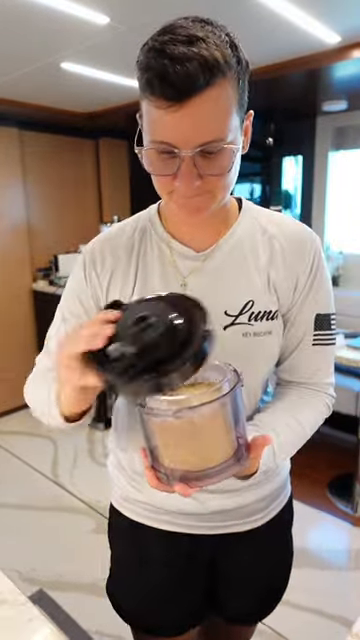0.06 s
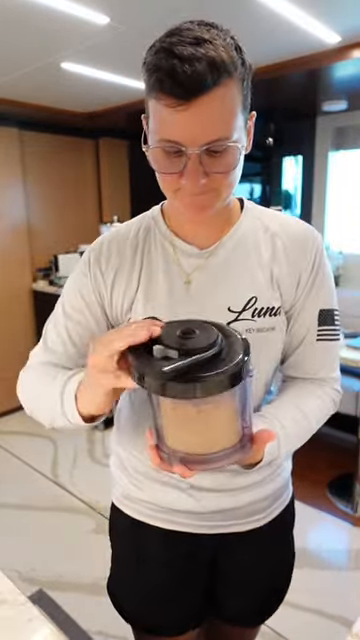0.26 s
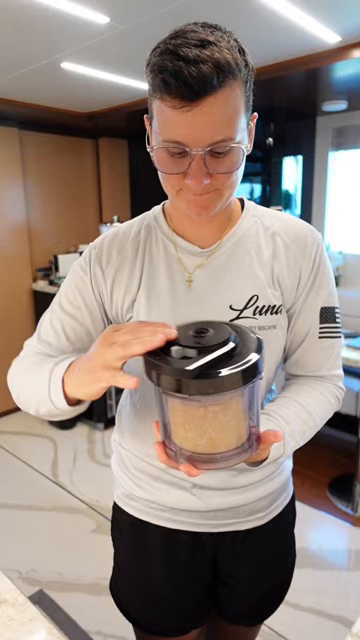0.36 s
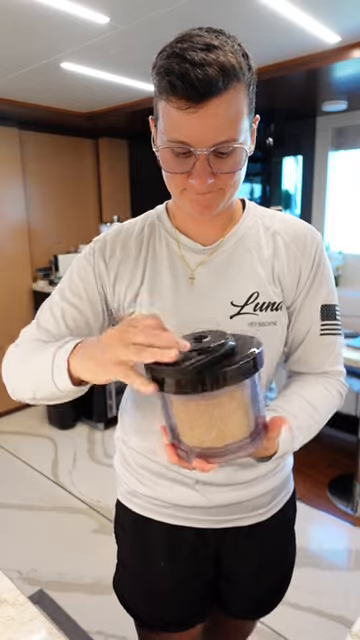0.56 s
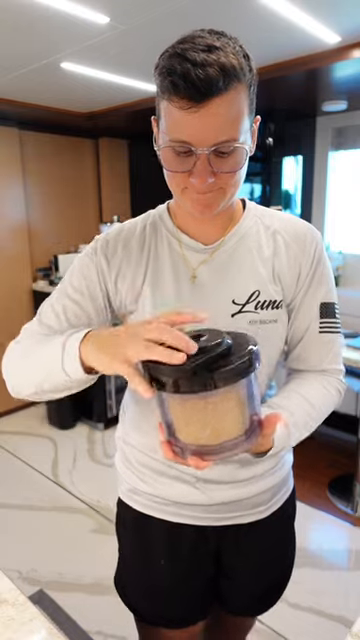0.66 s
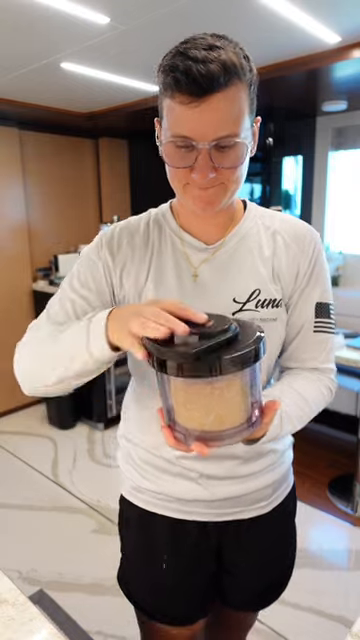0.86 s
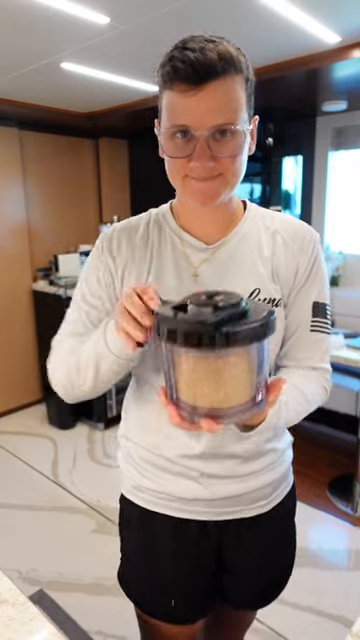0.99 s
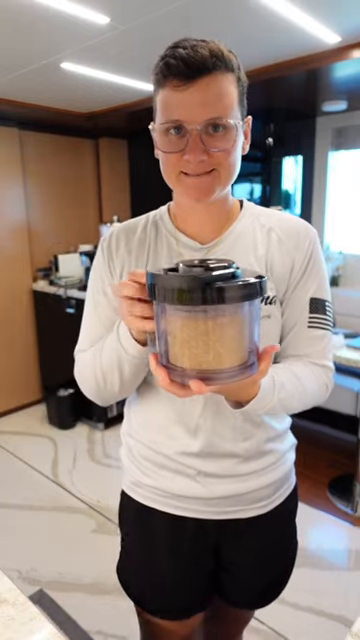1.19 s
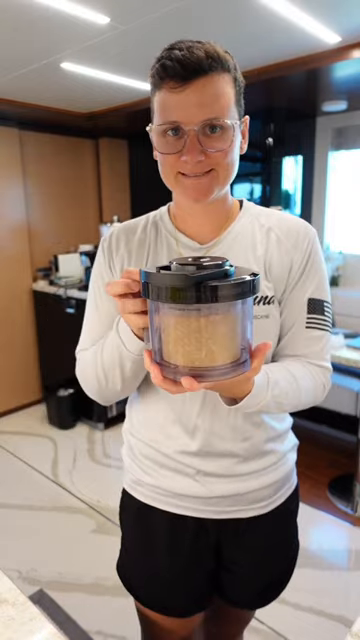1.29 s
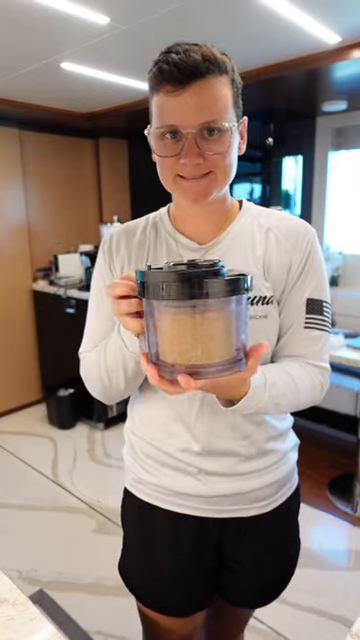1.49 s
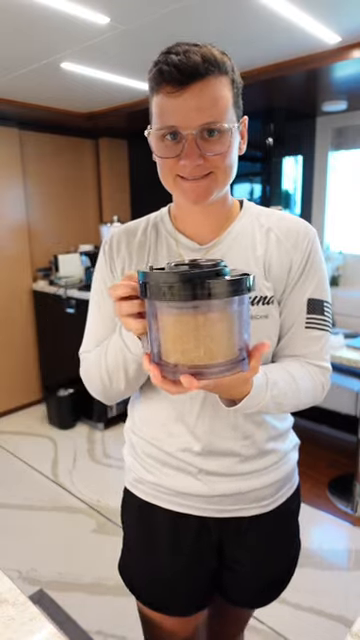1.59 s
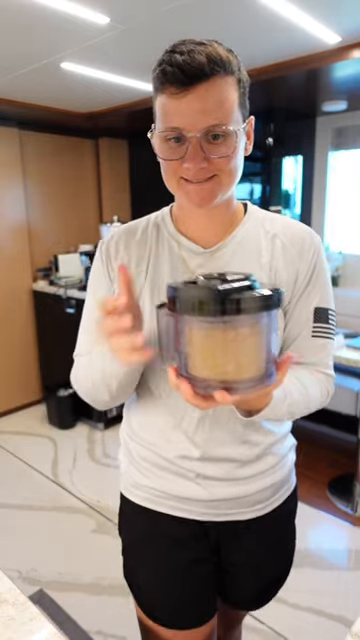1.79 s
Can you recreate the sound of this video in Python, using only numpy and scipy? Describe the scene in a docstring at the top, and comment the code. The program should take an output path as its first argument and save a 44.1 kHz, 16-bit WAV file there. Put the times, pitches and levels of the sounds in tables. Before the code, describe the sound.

A hard plastic lid is fitted onto a plastic bowl, close up. It rattles on the rim from about 0.2 seconds and clacks loudly into its seat near 0.45. Softer clacks and hollow thumps follow around 0.8 to 0.9. The latch snaps sharply shut at about 1.4 seconds, and fingers slide faintly off near 1.7. Ventilation hums throughout, and the small kitchen adds a short reverberation.

```python
"""A small galley, close up in stereo: a hard plastic lid is set on a filled plastic bowl and locked.
The loose lid rattles on the rim, clacks into its seat as it is pressed and twisted, and the latch snaps.
Each push draws a hollow thump from the bowl; at the end, fingers slide faintly off the lid.
Ventilation hums behind, and a limiter flattens the loudest snaps so that their room tails swell."""
import sys
import numpy as np
from scipy import signal
from scipy.fft import rfft, irfft
from scipy.io import wavfile
from scipy.ndimage import uniform_filter1d, minimum_filter1d

SR = 44100
rng = np.random.default_rng(int(sys.argv[2]) if len(sys.argv) > 2 else 0)


def transcribe(u):
    """Save the signal u as a 16-bit wav file named by the first command-line argument.

    u: samples, shape (n,) or (channels, n), limited to [-1, 1]; the rate is SR.
    q: integer samples, one column per channel.
    """
    v = np.clip(np.atleast_2d(u).T, -1, 1)
    q = np.round(v * 32767).astype(np.int16)
    wavfile.write(sys.argv[1], SR, q)


N = 81585

# air noise of the ventilation: frequency_hz, density_db
VENT_SPECTRUM = [(15, -75), (25, -51), (50, -24), (101, -3.5), (193, -13), (221, -4.5), (253, -8),
                 (368, -1.5), (421, -9.5), (509, -3), (582, -13.5), (1050, -23.5), (1240, -24.5),
                 (1380, -24), (2120, -32.5), (5140, -39.5), (15500, -53.5)]
# stereo width of the ventilation: frequency_hz, side_minus_mid_db
VENT_WIDTH = [(60, -25), (240, -22.5), (950, -8), (3770, -4), (15000, -9)]

# the lid clacks against the bowl, and at 0.85 s the latch snaps, sounding like a clack: start_s, level_db,
# tilt_db_per_octave, ring_db
CLACKS = [(0.169, -50, -2, -13), (0.4105, -28.5, -2, 1), (0.4298, -21.5, 2, -8), (0.4409, -6.5, .5, 1.5),
          (0.4505, -9, 0.5, -3), (0.685, -45.5, 2, -20), (0.817, -19, -4.5, 3), (0.85, -23.5, 3.5, -1),
          (0.9073, -22, -9.5, -6), (0.979, -45, 0, -4), (1.3897, -41, -1, -21), (1.419, -21, -3.5, -4)]
# spectrum of a clack: frequency_hz, density_db
CLACK_COLOUR = [(120, -40), (200, -38), (288, -10), (437, -1.5), (544, -10.5), (665, 1.5), (742, -7),
                (1190, -1.5), (1540, -8), (2170, -6.5), (4500, -11), (5390, -15), (10400, -19.5),
                (15500, -30.5)]
# modes of the bowl with the lid seated: pitch_hz, level_db, t60_s
SEATED_MODES = [(373, -5.5, 0.1), (466.6, -1.5, 0.15), (652, -42, 0.23), (983, -5, 0.27),
                (1050, -8.5, 0.18), (1162, -1, 0.17), (1173, -4, 0.22), (2145, -3, 0.2), (2259, -11, 0.31),
                (2436, -13, 0.24), (3310, -15.5, 0.19), (3374, -14.5, 0.16)]

# the loose lid knocks on the rim: start_s, level_db, tilt_db_per_octave, ring_db
KNOCKS = [(0.2348, -8.5, 1, 4.5), (0.2595, -15, 1.5, -4), (0.2862, -18, 2, -1), (0.3236, -15.5, -.5, -22),
          (0.343, -28.5, -5.5, -7), (0.361, -40.5, 9.5, 3)]
# spectrum of a knock: frequency_hz, density_db
KNOCK_COLOUR = [(120, -57), (200, -41), (223, -41), (345, -7.5), (399, -15), (437, -7), (596, -12.5),
                (677, 0), (812, -3), (1210, -10.5), (2330, -11.5), (4750, -19), (15500, -42.5)]
# modes of the loose lid: pitch_hz, level_db, t60_s
LOOSE_LID_MODES = [(692, -13, 0.22), (804, -5.5, 0.52), (832, 2.5, 0.21), (900, -30, .22), (920, -22, 0.18),
                   (1050, 7.5, 0.06), (1100, -8, 0.18), (2980, -8, 0.18)]

# hollow resonances of the bowl, woken by each push: start_s, pitch_hz, level_db, swell_s, t60_s
THUMPS = [(0.4105, 689, -8, 0.0052, 0.062), (0.8168, 1159, -16.5, 0.0022, 0.14),
          (0.8167, 590, -23, 0.0018, 0.12), (0.8168, 2083, -28.5, 0.0046, 0.11),
          (0.909, 361.4, -7.5, 0.014, 0.078), (1.3915, 608, -30, 0.0016, 0.092),
          (1.4215, 363, -5.5, 0.0065, 0.043), (1.4215, 487, -10.5, 0.0046, 0.041),
          (1.4215, 670, -11.5, 0.0043, 0.029), (1.422, 108, -25, 0.007, 0.034)]

# the latch snaps shut: start_s, level_db, tilt_db_per_octave, ring_db
SNAPS = [(1.4343, -1, 0, -4), (1.444, -9.5, 0.5, -11), (1.68, -42.5, -1.5, -14)]
# spectrum of a snap: frequency_hz, density_db
SNAP_COLOUR = [(120, -47), (220, -27), (330, -12), (450, -7.5), (660, 0), (820, -7), (1200, 1),
               (1900, -5.5), (2400, -9.5), (3400, -9), (4900, -8.5), (5700, -14), (8300, -12.5),
               (10500, -15), (12600, -10.5), (13800, -15.5), (15000, -26), (16000, -8)]
# modes of the tightly locked container: pitch_hz, level_db, t60_s
LOCKED_MODES = [(1151, -1, 0.31), (1172, -9, 0.36), (1230, -10, .25), (1298, -8, .28), (1797, -8, .3),
                (1897, -10, .27), (3432, -9, .25)]

# reverberation of the galley: frequency_hz, t60_s
GALLEY_DECAY = [(200, 0.31), (800, 0.26), (2500, 0.32), (6000, .32), (11000, 0.3), (16000, 0.25)]
# stereo width of the hits and their reverberation: frequency_hz, side_minus_mid_db
HIT_WIDTH = [(100, -12), (350, -31), (700, -13.5), (1500, -9.5), (5000, -10.5), (10000, -10), (14000, -21)]


def amp(db):
    """Decibels to gain."""
    return 10 ** (np.asarray(db) / 20)


def unit_rms(x):
    """Scales to an rms of one."""
    return x / np.sqrt(np.mean(x ** 2) + 1e-20)


def curve_at(points, hz):
    """Reads a table on a log-frequency axis."""
    points_hz, values = np.transpose(points)
    return np.interp(np.log(hz + 1), np.log(points_hz + 1), values)


def fade(t, t60_s):
    """Dies by 60 dB in t60_s."""
    return np.exp(-np.log(1000) * t / t60_s)


def add(mix, start_s, sound):
    """Mixes a sound in at start_s."""
    part = mix[:, round(start_s * SR):][:, :sound.shape[1]]
    part += sound[:, :part.shape[1]]


def coloured(x, colour, tilt_db, low_cut_hz=88, size=4096):
    """Causal filter of unit energy, tilted about 2 kHz, with a low cut: small parts radiate no bass."""
    hz = abs(np.fft.fftfreq(size, 1 / SR))
    octaves = np.log2(np.clip(hz, 400, 9000) / 2000)
    gain = unit_rms(amp(np.maximum(curve_at(colour, hz) + tilt_db * octaves, -90)))
    minimum_phase = np.exp(signal.hilbert(np.log(gain)).conj())
    taps = np.fft.ifft(minimum_phase).real[:size // 2]
    x = signal.sosfilt(signal.butter(2, low_cut_hz, "high", fs=SR, output="sos"), x)
    return signal.fftconvolve(x, taps[None], axes=1)[:, :x.shape[1]]


def spread(pair, width):
    """Takes two unrelated signals as mid and side and gives left and right of a given width."""
    mid, side = pair
    size = 2 * len(mid)
    side_gain = amp(curve_at(width, np.fft.rfftfreq(size, 1 / SR)))
    side = irfft(rfft(side, size) * side_gain)[:len(mid)]
    return np.array([mid + side, mid - side])


def galley_tail(delay_s=0.0037, rise_s=0.0064, late_db=-34.5, late_t60_s=1):
    """Dense reflections off near walls build quickly and die band by band, over a faint longer tail."""
    hz, t, spectrum = signal.stft(rng.standard_normal((2, SR)), SR, nperseg=256)
    decay = fade(t, curve_at(GALLEY_DECAY, hz)[:, None]) + amp(late_db) * fade(t, late_t60_s)
    tail = signal.istft(spectrum * decay, SR, nperseg=256)[1][:, :SR]
    build_up = np.clip((np.arange(SR) / SR - delay_s) / rise_s, 0, 1)
    return spread(tail * build_up, HIT_WIDTH)


def in_galley(direct, wet_db):
    """A sound reaches the microphone directly, then off the walls."""
    tail = galley_tail()
    reflections = signal.fftconvolve(direct[None], tail / np.linalg.norm(tail[0]), axes=1)
    return direct + amp(wet_db) * reflections[:, :len(direct)]


def ventilation(air_db=-41, patchy_db=2, hum_hz=111.2, hum_db=-54.5):
    """Room tone: low, slightly patchy air noise and a fan hum."""
    hz, _, spectrum = signal.stft(rng.standard_normal((2, N)), SR, nperseg=2048)
    patches = uniform_filter1d(rng.standard_normal(spectrum.shape[1:]), size=14, axis=0)
    patches = unit_rms(uniform_filter1d(patches, size=4, axis=1))  # smooth in frequency and time
    gain = amp(curve_at(VENT_SPECTRUM, hz)[:, None] + patchy_db * patches)
    air = signal.istft(spectrum * gain, SR, nperseg=2048)[1][:, :N]
    hum = np.sqrt(2) * np.sin(2 * np.pi * hum_hz * np.arange(N) / SR)
    return amp(air_db) * unit_rms(spread(air, VENT_WIDTH)) + amp(hum_db) * hum


def plastic_hit(colour, modes, level_db, tilt_db, ring_db, crack_t60_s, tail_db=-7, ring_trim_db=-11.5):
    """Plastic on plastic: a short dense crack, its room tail, and the ringing modes of the part."""
    t = np.arange(SR) / SR
    crack = spread(rng.standard_normal((2, SR)) * fade(t, crack_t60_s), HIT_WIDTH)
    contact = coloured(crack + amp(tail_db) * galley_tail(), colour, tilt_db)
    ring = sum((-1) ** k * amp(mode_db) * fade(t, t60_s) * np.sin(2 * np.pi * hz * t)
               for k, (hz, mode_db, t60_s) in enumerate(modes))
    return amp(level_db) * (contact + amp(ring_trim_db + ring_db) * in_galley(ring, wet_db=-7.5))


def seat_clack(*strike):
    """The lid strikes its seat and rings together with the bowl."""
    return plastic_hit(CLACK_COLOUR, SEATED_MODES, *strike, crack_t60_s=0.041)


def rim_knock(*strike):
    """The loose lid knocks on the rim and rings on its own."""
    return plastic_hit(KNOCK_COLOUR, LOOSE_LID_MODES, *strike, crack_t60_s=0.048)


def bowl_thump(pitch_hz, level_db, swell_s, t60_s):
    """A soft push swells one damped resonance of the bowl."""
    t = np.arange(SR) / SR
    envelope = np.minimum(t / swell_s, 1) * fade(t, t60_s)
    return amp(level_db) * in_galley(envelope * np.sin(2 * np.pi * pitch_hz * t), wet_db=-13.5)


def latch_snap(*strike):
    """The latch snaps shut and rings the tightly locked container."""
    return plastic_hit(SNAP_COLOUR, LOCKED_MODES, *strike, crack_t60_s=0.033)


def finger_slide(length_s=0.2, level_db=-61.5):
    """A faint hiss of skin sliding off the locked lid."""
    t = np.arange(0, length_s, 1 / SR)
    rub = rng.standard_normal((len(t), 2)).T * np.sin(np.pi * t / length_s)
    return amp(level_db) * coloured(spread(rub, HIT_WIDTH), CLACK_COLOUR, tilt_db=3)


def scene():
    """At the microphone: lid, latch and bowl in front, ventilation behind."""
    mix = ventilation()
    sources = [(bowl_thump, THUMPS), (rim_knock, KNOCKS), (latch_snap, SNAPS), (seat_clack, CLACKS)]
    for source, events in sources:
        for start_s, *settings in events:
            add(mix, start_s, source(*settings))
    add(mix, start_s=1.68, sound=finger_slide())
    return mix


def record(dry):
    """After the microphone: a fast limiter that recovers steadily, a soft ceiling, then a low-pass."""
    threshold_db, recovery_db_per_s, ceiling_db, top_hz = -15.5, 196, -7.5, 15800
    power_db = 10 * np.log10(abs(uniform_filter1d((dry ** 2).mean(0), size=100)) + 1e-12)
    recovery_db = np.arange(N) / SR * recovery_db_per_s
    held_db = np.maximum.accumulate(power_db + recovery_db) - recovery_db
    cut_db = np.maximum(held_db - threshold_db, 0)
    cut_db = -minimum_filter1d(-cut_db, size=60)  # widened so that smoothing keeps its depth
    limited = dry / amp(uniform_filter1d(cut_db, size=60))
    rounded = limited / (1 + (limited / amp(ceiling_db)) ** 6) ** (1 / 6)
    low_pass = signal.firwin(511, top_hz, window=("kaiser", 9), fs=SR)
    return signal.oaconvolve(rounded, low_pass[None], "same")


dry = scene()
out = record(dry)
transcribe(out)
```